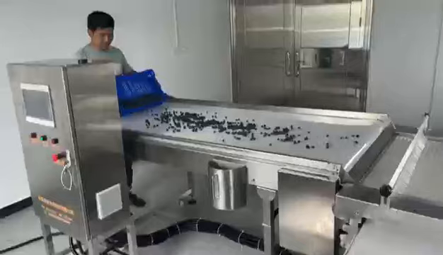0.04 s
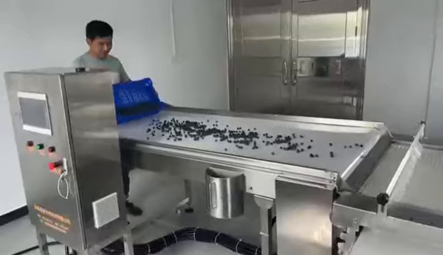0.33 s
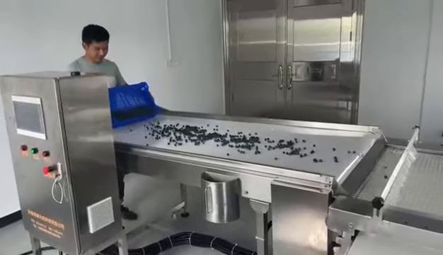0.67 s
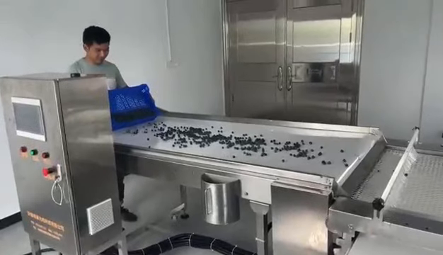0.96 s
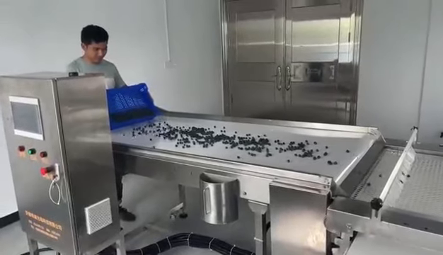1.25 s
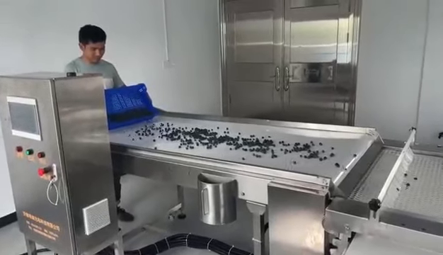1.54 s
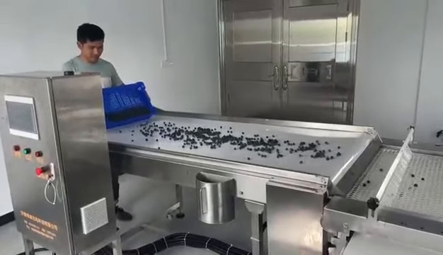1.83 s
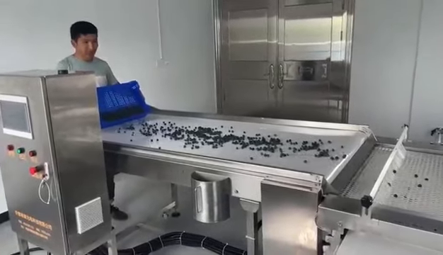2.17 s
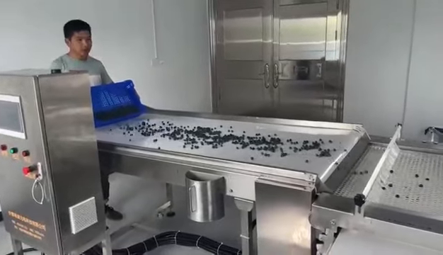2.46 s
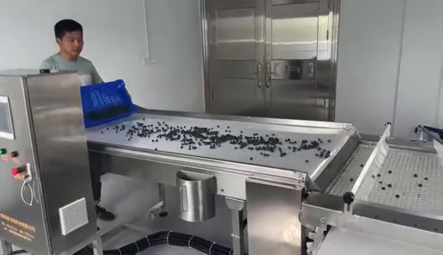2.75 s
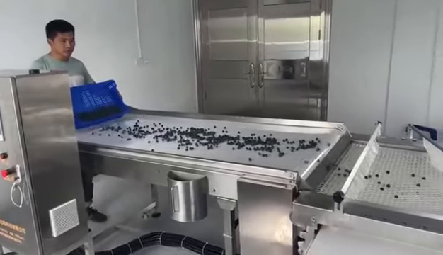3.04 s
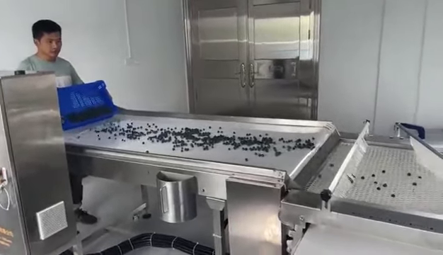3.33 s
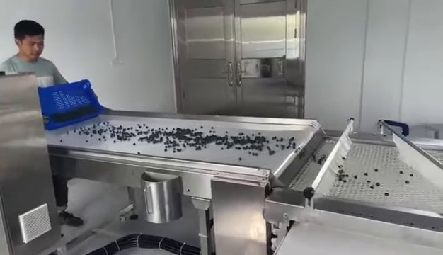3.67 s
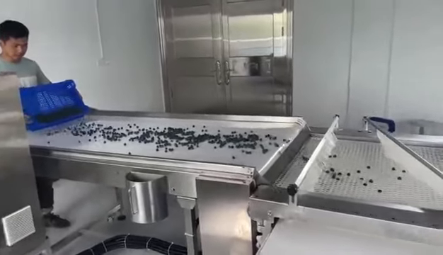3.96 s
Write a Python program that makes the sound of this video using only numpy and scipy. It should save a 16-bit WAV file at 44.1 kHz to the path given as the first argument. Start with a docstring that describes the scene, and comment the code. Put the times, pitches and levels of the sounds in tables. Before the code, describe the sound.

A berry sorting conveyor rattles and drums continuously as fruit pours onto it, clumps knocking and loose steel parts ringing briefly. A dull thud comes near the end. Motor hum and rushing air fill the room, heard from nearby.

```python
"""A hard-walled room with a berry sorting line running a couple of metres away.
Berries tipped from a crate drum on the resonant conveyor bed, and clumps land with heavier knocks.
Small contacts on the belt rattle and sizzle in sharp bursts, berries tick on steel, loose parts ring
and the frame takes one dull thud. Behind it all, motors hum and a blower rushes.
The sound cuts in after a moment of silence."""
import sys
import numpy as np
from scipy import signal
from scipy.fft import rfft, irfft
from scipy.io import wavfile
from scipy.ndimage import uniform_filter1d

SR = 44100
rng = np.random.default_rng(int(sys.argv[2]) if len(sys.argv) > 2 else 0)


def master_out(mix):
    """Clip the mix to full scale and print it as 16-bit PCM to the path in sys.argv[1]."""
    frames = np.transpose(np.atleast_2d(mix))
    ceiling = np.clip(frames, -1, 1)
    pcm = np.round(ceiling * 32767).astype(np.int16)
    wavfile.write(sys.argv[1], SR, pcm)


N = 176400
T = np.arange(N) / SR
F = np.maximum(np.arange(N // 2 + 1) * SR / N, 1)

# Resonances of the conveyor bed: pitch_hz, width_hz, gain_db
BED_MODES = [(169.7, 32, -12.5), (243.7, 53.5, 0.5), (277.2, 52, -2), (326.8, 67, -3), (392, 55, -8.5),
             (456.3, 69, -7), (503, 56, -6.5), (615.4, 132, -11), (727.5, 45, -1), (802, 75, -8),
             (861, 95, -6.5), (1008, 335, -16), (1660, 240, -29.5)]
# Tone colour of the belt's rattle: frequency_hz, relative_db
RATTLE_EQ = [(600, -2), (1200, 1), (1430, -4.5), (1650, 2), (2800, 3), (3900, 0), (4600, -6.5), (6000, 0.5),
             (9000, -30), (11000, -67)]
# Tone colour of the belt's bright sizzle: frequency_hz, relative_db
SIZZLE_EQ = [(3000, -13), (4800, -54), (5800, -4.5), (6800, 1.5), (7550, 1.5), (7800, 1), (8700, -2.5),
             (9800, -3.5), (10600, -25.5), (11200, -14), (12800, -18.5), (13400, -5.5), (14000, -4.5)]
# Fader ride on rattle, sizzle and ticks as the belt fills: time_s, gain_db
BELT_LOAD = [(.2, -2.5), (.65, -0.5), (1.3, 1), (2.2, 0), (2.6, 1.5), (2.8, 1.5), (3.5, 1), (4, 1)]


def berries(split_hz=380):
    """Soft berries rain on the bed: its low resonances drum, its higher ones patter."""
    # Fader ride on the low drumming: time_s, level_db
    drum_ride = [(.2, -48), (.55, -46), (.78, -41.5), (.85, -42), (.91, -40.5), (1.2, -44), (1.48, -44),
                 (1.6, -41.5), (2.02, -43), (2.23, -43), (2.31, -52), (2.49, -40.5), (2.66, -45),
                 (2.96, -43), (3.17, -45), (3.48, -44), (3.88, -38.5), (4, -45)]
    # Fader ride on the brighter patter: time_s, level_db
    patter_ride = [(.2, -48.5), (.55, -49.5), (.77, -43.5), (.84, -46), (1.2, -42), (1.38, -46), (1.6, -45),
                   (1.8, -45), (2.18, -43.5), (2.29, -48), (2.49, -41.5), (2.68, -47), (3.04, -41),
                   (3.34, -46), (3.7, -39.5), (3.9, -40), (4, -37.5)]
    hits = impacts(per_s=520, spread_db=1.5) * np.sign(rng.standard_normal(N))
    spectrum = rfft(room(bed(hits)))
    lowpass = 1 / (1 + (F / split_hz) ** 10)
    drum = unit(irfft(spectrum * lowpass, N))
    patter = unit(irfft(spectrum * (1 - lowpass), N))
    return drum * undb(curve(drum_ride)) + patter * undb(curve(patter_ride))


def bed(hits):
    """Hits ring the conveyor bed, a bank of resonances of alternating polarity."""
    response = sum((-1) ** k * undb(db) / (1 + 1j * (F / hz - hz / F) * hz / width) ** 2
                   for k, (hz, width, db) in enumerate(BED_MODES))
    return irfft(rfft(hits) * response, N)


def knocks(split_hz=380, rise_s=0.0062, detune=0.015, spread_db=2.5):
    """Clumps of berries land: the bed booms and its steel rings, a little differently at each spot."""
    # Clump landings: start_s, boom_db, ring_db
    landings = [(.68, -37, -53), (.755, -43, -40.5), (.888, -34, -40.5), (.955, -33, -52),
                (1.015, -37, -56), (1.07, -44, -45), (1.136, -35.5, -48), (1.184, -37, -45),
                (1.645, -39, -45), (1.875, -50, -41), (1.989, -39, -53), (2.065, -40.5, -36.5),
                (2.136, -38, -35.5), (2.175, -35, -40), (2.233, -34.5, -57), (2.345, -41, -41.5),
                (2.42, -41, -38.5), (2.46, -38, -39.5), (2.495, -36.5, -43), (2.765, -34.5, -46),
                (2.964, -36.5, -44.5), (3.46, -46, -40), (3.859, -41.5, -44), (3.893, -35, -35.5)]
    hz, _, db = np.array(BED_MODES).T[:, :, None]
    is_low = hz[:, 0] < split_hz
    age, out = T[:SR // 3], np.zeros(N + SR)
    envelope = (1 - np.exp(-age / rise_s)) * decay(age, t60_s=0.12)
    for start_s, boom_db, ring_db in landings:
        tuning, strength, phase = rng.standard_normal((3, len(BED_MODES), 1))
        pitch_hz = hz * (1 + detune * tuning)
        modes = undb(db + spread_db * strength) * envelope * np.sin(2 * np.pi * (pitch_hz * age + phase))
        boom = undb(boom_db) * unit_peak(modes[is_low].sum(0), window=900)
        ring = undb(ring_db) * unit_peak(modes[~is_low].sum(0), window=900)
        at = int(start_s * SR)
        out[at:at + len(age)] += boom + ring
    return room(out[:N])


def belt(rattle_db=-46, sizzle_db=-41.5):
    """Small contacts rattle and sizzle, louder as the belt fills."""
    load_db = curve(BELT_LOAD)
    rattle = spatter(per_s=60, spread_db=4.5, t60_s=0.1, band_hz=595, broad_share=0.098, bands=9)
    sizzle = spatter(per_s=80, spread_db=5.5, t60_s=0.094, band_hz=913, broad_share=0.066, bands=15)
    return (colour(rattle * undb(rattle_db + load_db), RATTLE_EQ)
            + colour(sizzle * undb(sizzle_db + load_db), SIZZLE_EQ))


def spatter(per_s, spread_db, t60_s, band_hz, broad_share, bands):
    """Noise bursts of small contacts, some broadband, most confined to one band."""
    broadband, spectrum = bursts(per_s, spread_db, t60_s), 0
    position = np.minimum(F / band_hz, bands)  # the last band takes all the treble above it
    for centre in range(1, bands + 1):
        power = broad_share * broadband + (1 - broad_share) * bursts(per_s, spread_db, t60_s)
        band = np.sqrt(np.maximum(1 - np.abs(position - centre), 0))
        spectrum = spectrum + band * rfft(np.sqrt(power) * rng.standard_normal(N))
    return irfft(spectrum, N)


def bursts(per_s, spread_db, t60_s, rise_s=0.0055):
    """Contact power with a slightly softened attack, scaled to a mean of 1."""
    power = signal.lfilter([1], [1, -np.exp(-1 / (rise_s * SR))], contact_power(per_s, spread_db, t60_s))
    return power / power.mean()


def contact_power(per_s, spread_db, t60_s):
    """Power envelope of overlapping contacts, each starting at once and dying away."""
    feedback = decay(1 / SR, t60_s) ** 2
    return signal.lfilter([1], [1, -feedback], impacts(per_s, spread_db) ** 2)


def clatters():
    """Quick flurries of hard contacts put sharp, grainy accents on the belt."""
    # The belt's sharpest clatters: start_s, length_s, rattle_db, sizzle_db
    accents = [(0.532, 0.021, -42.5, -51), (0.593, 0.022, -52, -41), (0.752, 0.057, -47.5, -44),
               (1.202, .02, -42, -38.5), (1.317, 0.017, -43.5, -46), (1.393, 0.028, -42.5, -48),
               (1.48, 0.039, -44, -40.5), (1.862, 0.0099, -40.5, -51), (2.082, .045, -41.5, -41),
               (2.241, 0.045, -42, -43), (2.366, 0.016, -42, -46), (2.428, 0.064, -61, -39.5),
               (2.584, 0.022, -45, -58), (2.63, 0.022, -46, -53), (2.712, 0.03, -42.5, -44),
               (2.806, 0.017, -40, -37), (2.856, .025, -44, -46), (2.967, 0.022, -43, -42),
               (3.131, 0.056, -45.5, -37.5), (3.418, 0.027, -53, -46), (3.489, .012, -44, -43),
               (3.632, 0.07, -45, -43), (3.705, 0.047, -44, -37), (3.751, 0.041, -40.5, -41.5),
               (3.874, .03, -39, -41), (3.947, 0.017, -40, -52)]
    rattle, sizzle = 0, 0
    for start_s, length_s, rattle_db, sizzle_db in accents:
        envelope = flurry(start_s, length_s, rise_s=0.013, t60_s=0.08)
        rattle = rattle + undb(rattle_db) * envelope
        sizzle = sizzle + undb(sizzle_db) * envelope
    grain = unit(np.sqrt(contact_power(per_s=700, spread_db=0.5, t60_s=0.037)))
    rattle_noise, sizzle_noise = grain * rng.standard_normal((2, N))
    return colour(rattle * rattle_noise, RATTLE_EQ) + colour(sizzle * sizzle_noise, SIZZLE_EQ)


def ticks(per_s=48, spots=16, modes=5, range_hz=(1703, 3990), base_db=-52.5):
    """Single berries tick against steel; each spot rings briefly with a few modes of its own."""
    age, out = T[:SR // 8], 0
    for _ in range(spots):
        hz = rng.uniform(*range_hz, (modes, 1))
        strength = rng.standard_normal((modes, 1))
        partials = strength * np.sin(2 * np.pi * hz * age)
        ring = unit(partials.sum(0) * decay(age, t60_s=0.057))
        out = out + signal.fftconvolve(impacts(per_s / spots, spread_db=1), ring)[:N]
    return unit(room(out)) * undb(base_db + curve(BELT_LOAD))


def loose_parts():
    """Loose steel parts ring in a cluster of close modes while shaken, then die away."""
    # Short steel rings: start_s, length_s, pitch_hz, width_hz, level_db
    shakes = [(2.288, 0.094, 1610, 110, -48), (2.725, 0.017, 3800, 400, -45),
              (3.06, 0.029, 2850, 350, -42.5), (3.098, 0.017, 1900, 450, -45), (3.129, .03, 2690, 300, -45),
              (3.408, 0.064, 3080, 600, -45), (3.634, .04, 2100, 400, -44.5), (3.8, 0.14, 857, 190, -40.5)]
    return sum(undb(db) * cluster(hz, width_hz) * flurry(start_s, length_s, rise_s=0.013, t60_s=0.12)
               for start_s, length_s, hz, width_hz, db in shakes)


def thud(level_db=-30.5):
    """One soft, dull bump on the frame."""
    bump = cluster(hz=227, width_hz=109) * flurry(start_s=3.565, length_s=0, rise_s=0.04, t60_s=0.13)
    return undb(level_db) * unit_peak(bump, window=1500)


def cluster(hz, width_hz):
    """Many close modes shaken at random: a pitched band of noise."""
    return unit(irfft(rfft(rng.standard_normal(N)) / (1 + ((F - hz) / width_hz) ** 2) ** 2, N))


def motors(surge_at_s=1.51, surge_half_s=0.1, surge_db=12):
    """Motors hum in tones that waver in pitch and level; the second tone swells once."""
    # Motor and frame tones: pitch_hz, base_db, waver_hz, waver_db
    hum = [(60.1, -52, 0.29, 1), (100.7, -54, 1.68, 4.5), (168.17, -54.5, 1.75, 2.5), (395, -55, 0.78, 4.5),
           (702, -66.5, 2.3, 7)]
    tones = []
    for hz, base_db, waver_hz, waver_db in hum:
        gain = undb(base_db + waver_db * wander(per_s=9))
        pitch_hz = hz + waver_hz * wander(per_s=14)
        tones.append(gain * unit(np.sin(2 * np.pi * np.cumsum(pitch_hz) / SR)))
    tones[1] *= undb(surge_db * np.exp(-((T - surge_at_s) / surge_half_s) ** 2))
    return sum(tones)


def blower(base_db=-41, flutter_db=1):
    """A steady rush of air with a slight flutter."""
    # Tone colour of the rushing air: frequency_hz, relative_db
    air_eq = [(20, -16), (45, -3), (80, -2), (120, 2.5), (145, 0.5), (200, 4), (260, 2), (335, 1), (450, 1),
              (600, -5), (870, -6), (1150, -11), (1450, -11.5), (1700, -10.5), (3200, -16.5), (4700, -32),
              (7200, -2), (9500, -23), (11000, -53), (12800, -28), (13800, -20.5)]
    return colour(rng.standard_normal(N), air_eq) * undb(base_db + flutter_db * wander(per_s=18))


def room(x, predelay_s=0.0055, t60_s=0.26, wet_db=-8):
    """Hard walls add a short, diffuse tail."""
    tail = rng.standard_normal(N) * (T >= predelay_s) * decay(T - predelay_s, t60_s)
    return x + undb(wet_db) * signal.fftconvolve(x, tail / np.sqrt(np.sum(tail ** 2)))[:N]


def impacts(per_s, spread_db):
    """Randomly timed impulses of uneven size."""
    chance, size = rng.random(N), rng.standard_normal(N)
    return (chance < per_s / SR) * undb(spread_db * np.clip(size, -2, 2))


def flurry(start_s, length_s, rise_s, t60_s):
    """Envelope with a linear attack and a release that begins length_s after the start."""
    return np.clip((T - start_s) / rise_s, 0, 1) * decay(T - start_s - length_s, t60_s)


def decay(age, t60_s):
    """Full level until age 0, then a fall of 60 dB every t60_s."""
    return np.exp(-np.log(1000) * np.maximum(age, 0) / t60_s)


def wander(per_s):
    """Smooth random drift with an rms of 1."""
    hold = int(SR / per_s)
    steps = np.repeat(rng.standard_normal(N // hold + 1), hold)
    return unit(uniform_filter1d(uniform_filter1d(steps, hold), hold)[:N])


def colour(x, eq):
    """EQ by a (frequency_hz, relative_db) outline, keeping the power of white noise."""
    hz, db = np.array(eq).T
    gain = undb(np.interp(np.log(F), np.log(hz), db))
    return irfft(rfft(x) * unit(gain), N)


def curve(rows):
    """Straight lines through (time_s, value) rows."""
    return np.interp(T, *np.array(rows).T)


def undb(db):
    """Decibels to gain."""
    return 10 ** (np.asarray(db) / 20)


def unit(x):
    """Scale to an rms of 1."""
    return x / np.sqrt(np.mean(x ** 2))


def unit_peak(x, window):
    """Scale so the loudest stretch of `window` samples has an rms of 1."""
    return x / np.sqrt(uniform_filter1d(x ** 2, size=window).max())


def scene():
    """The whole sorting line, mixed to mono."""
    # Fader ride on the motors and blower: time_s, gain_db
    machine_ride = [(.2, -2.5), (.7, 0), (1.5, -0.5), (4, 3.5)]
    machinery = (motors() + blower()) * undb(curve(machine_ride))
    mix = machinery + berries() + knocks() + thud() + belt() + clatters() + ticks() + loose_parts()
    return mix[None]


def record(dry):
    """The sound cuts in abruptly, with the top treble steeply filtered off."""
    start_s, top_hz = 0.2115, 14000
    lowpass = signal.ellip(10, .2, 80, top_hz, fs=SR, output="sos")
    return signal.sosfilt(lowpass, dry * (T >= start_s))


dry = scene()
out = record(dry)
master_out(out)
```